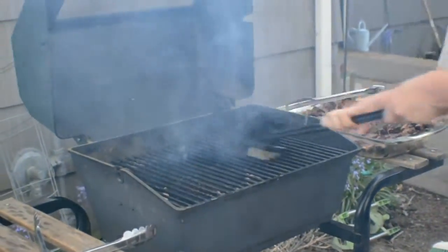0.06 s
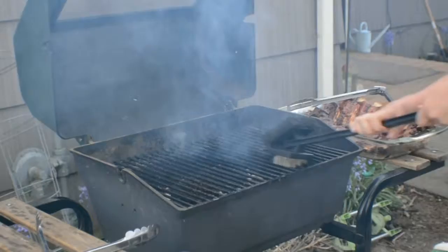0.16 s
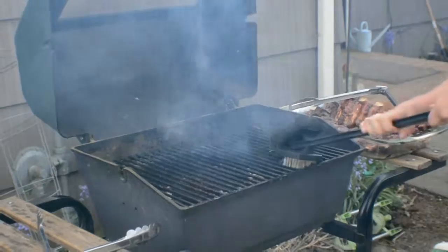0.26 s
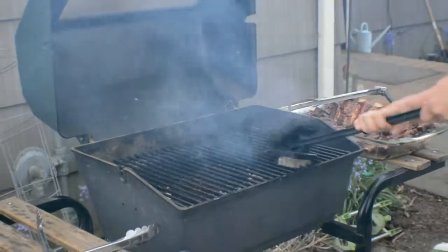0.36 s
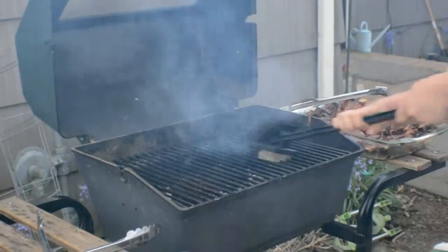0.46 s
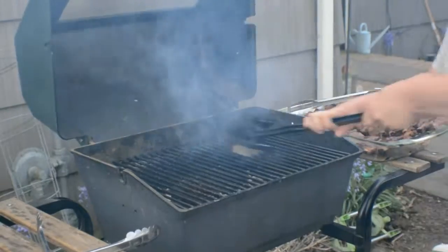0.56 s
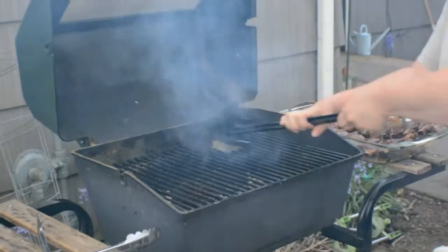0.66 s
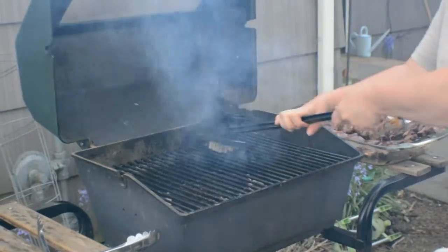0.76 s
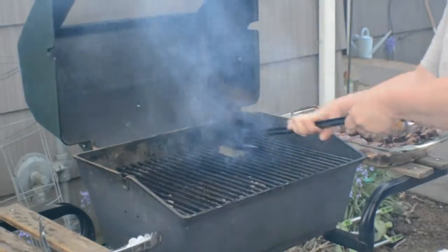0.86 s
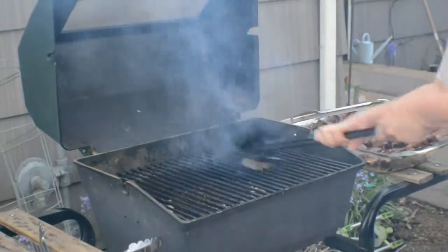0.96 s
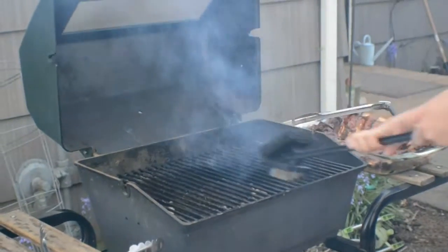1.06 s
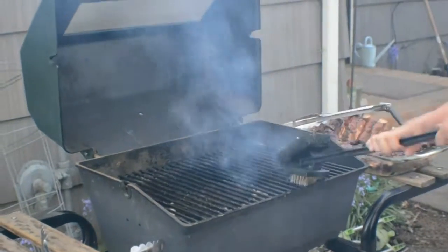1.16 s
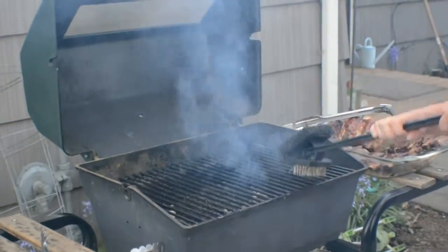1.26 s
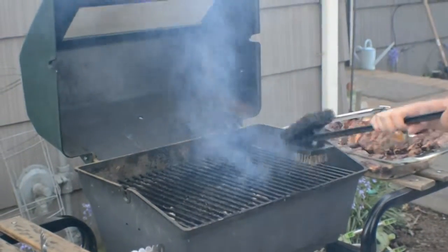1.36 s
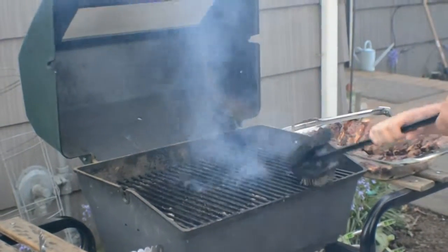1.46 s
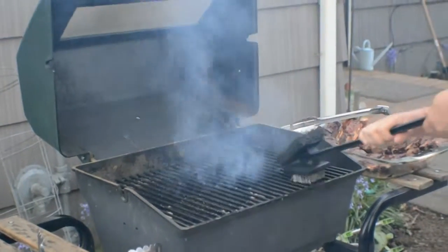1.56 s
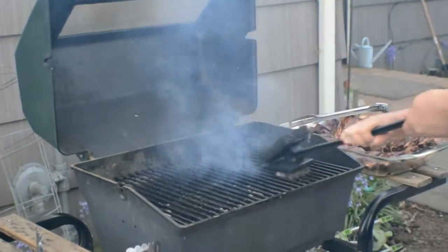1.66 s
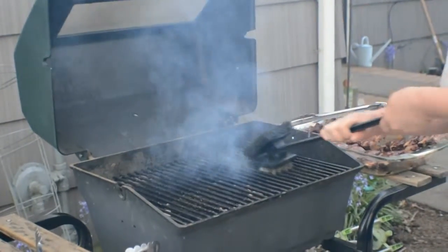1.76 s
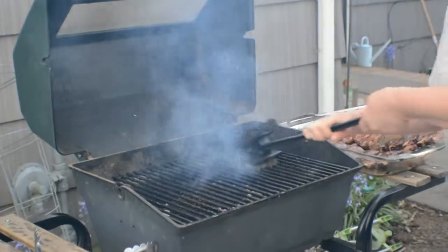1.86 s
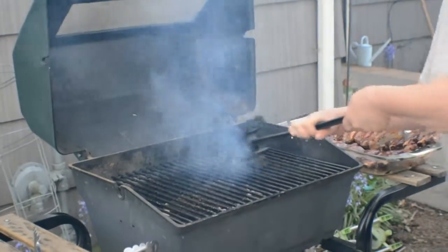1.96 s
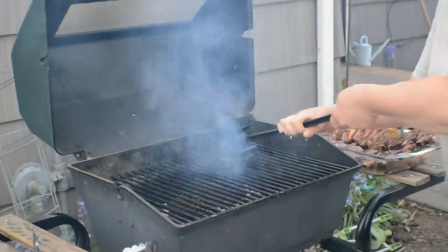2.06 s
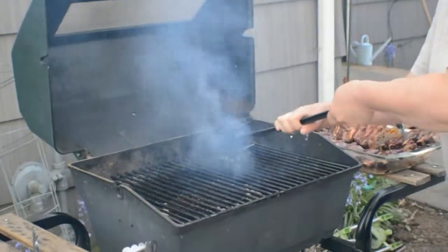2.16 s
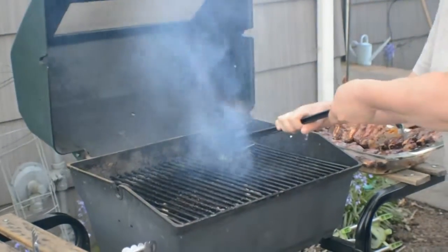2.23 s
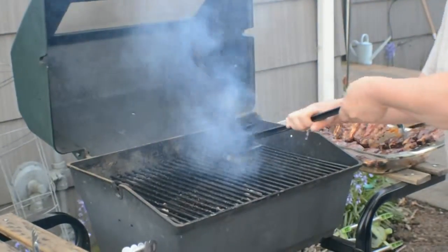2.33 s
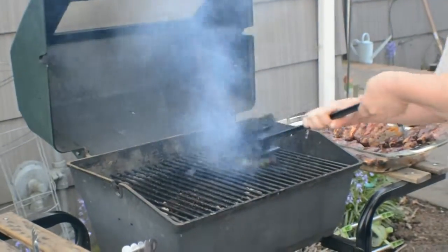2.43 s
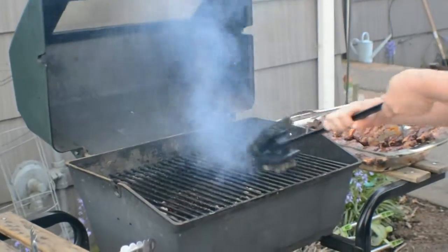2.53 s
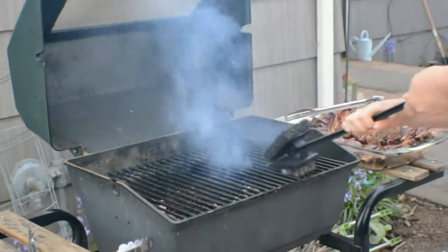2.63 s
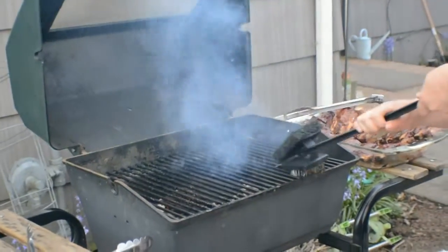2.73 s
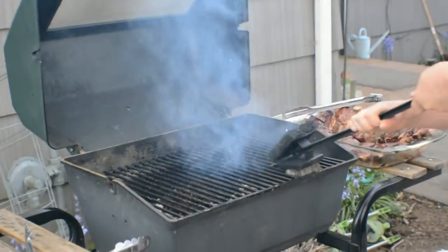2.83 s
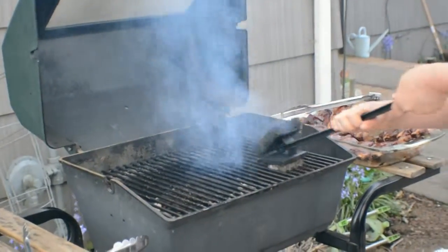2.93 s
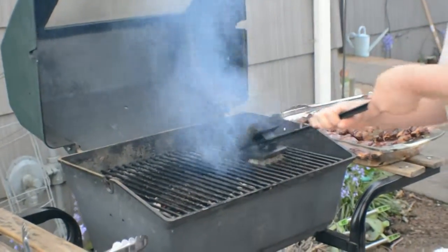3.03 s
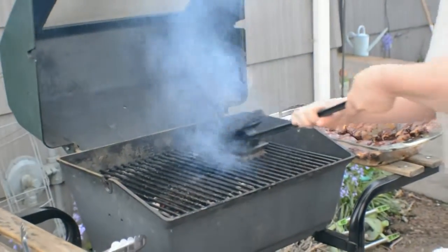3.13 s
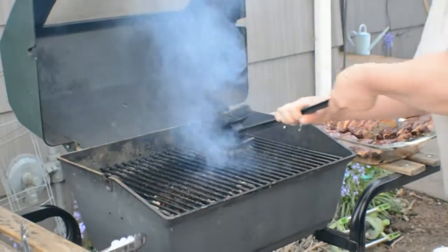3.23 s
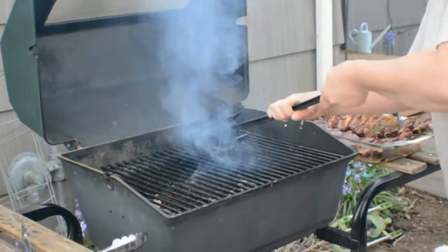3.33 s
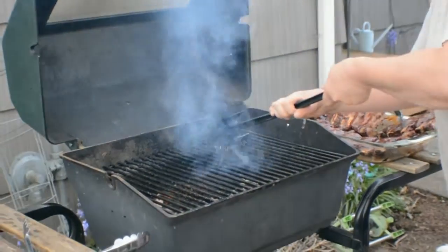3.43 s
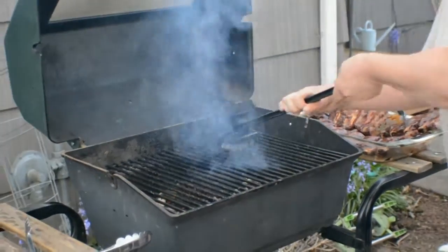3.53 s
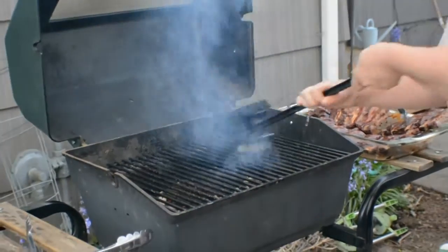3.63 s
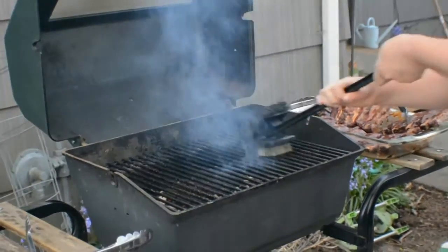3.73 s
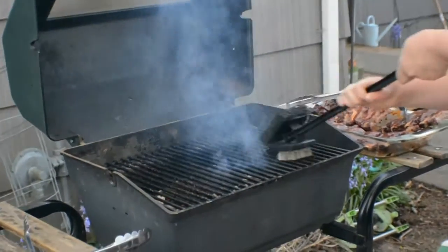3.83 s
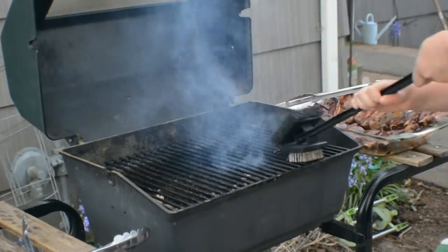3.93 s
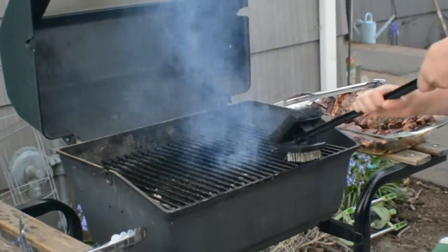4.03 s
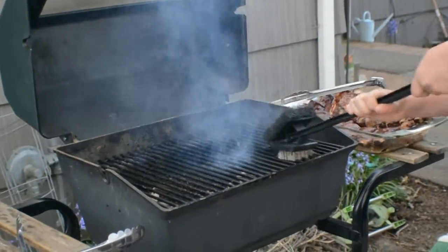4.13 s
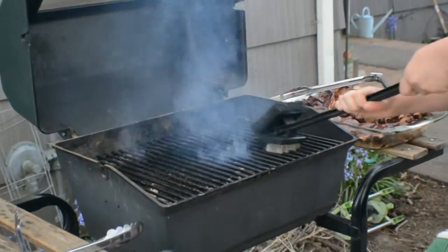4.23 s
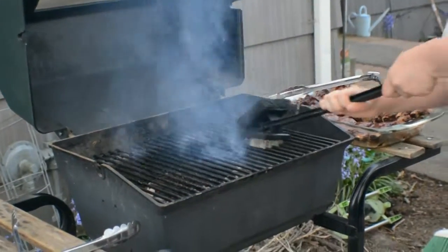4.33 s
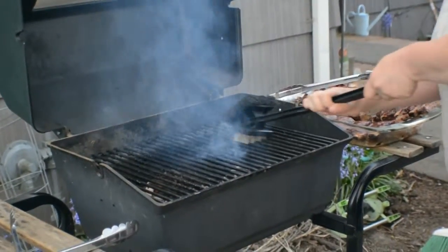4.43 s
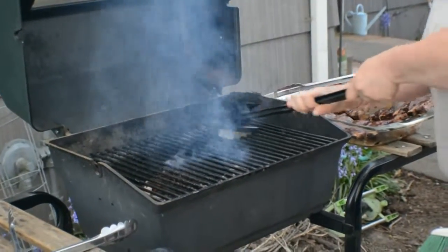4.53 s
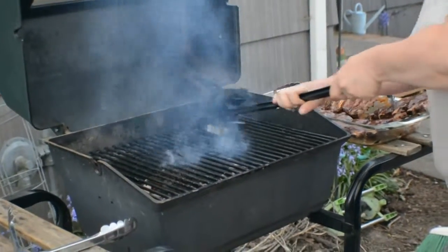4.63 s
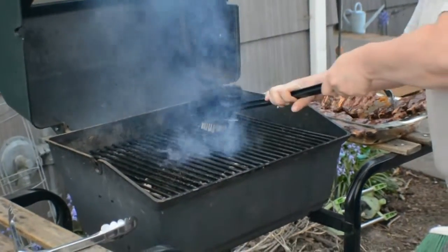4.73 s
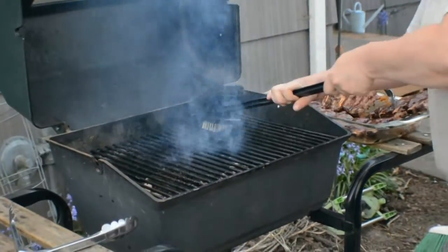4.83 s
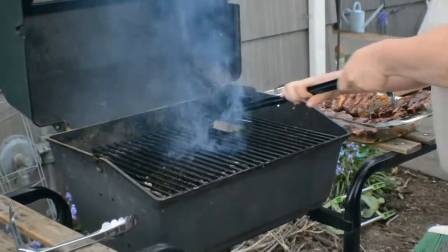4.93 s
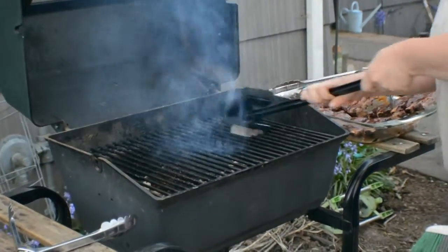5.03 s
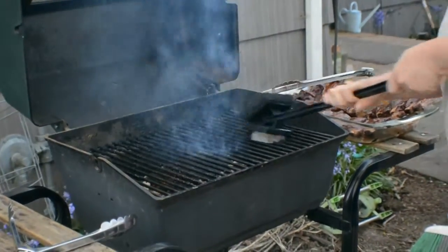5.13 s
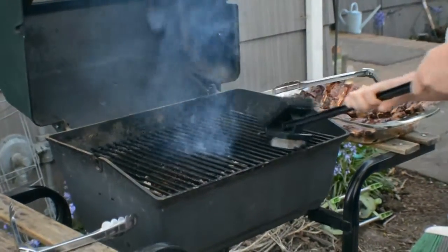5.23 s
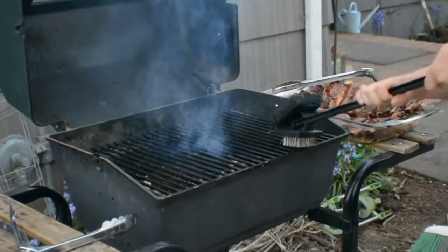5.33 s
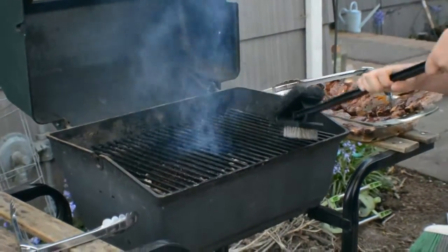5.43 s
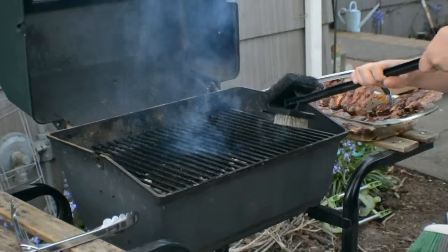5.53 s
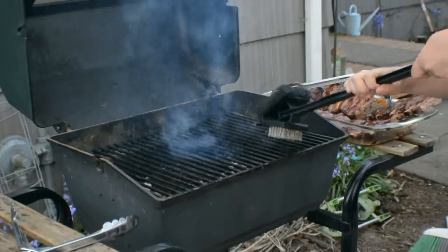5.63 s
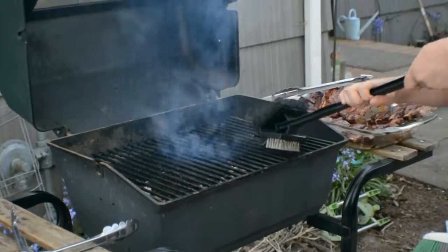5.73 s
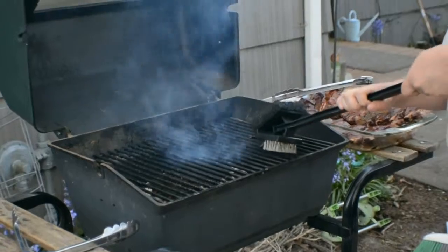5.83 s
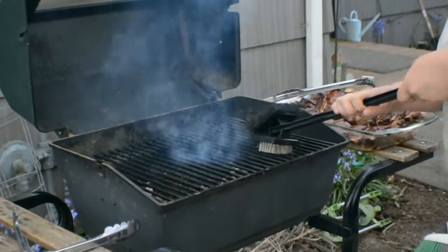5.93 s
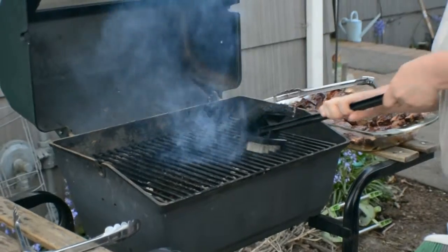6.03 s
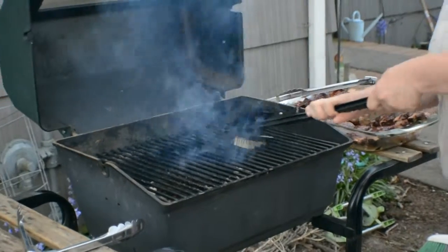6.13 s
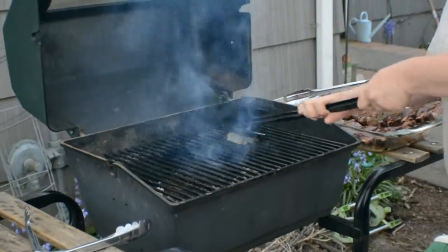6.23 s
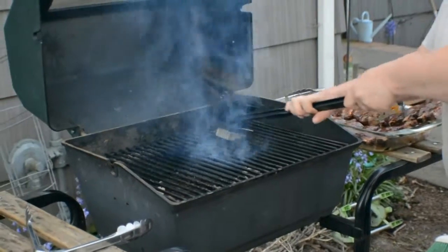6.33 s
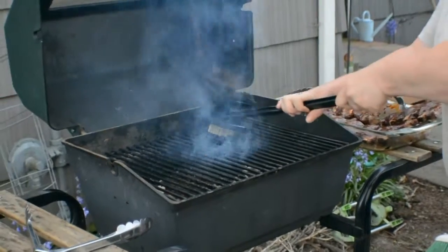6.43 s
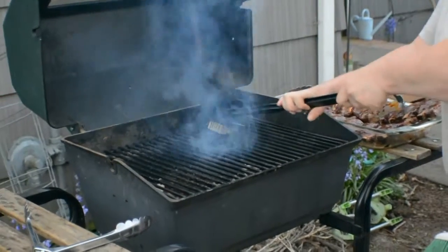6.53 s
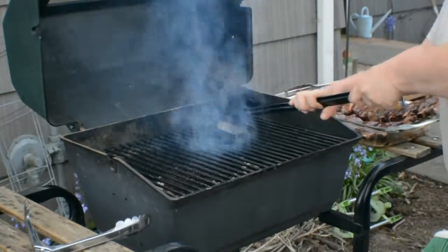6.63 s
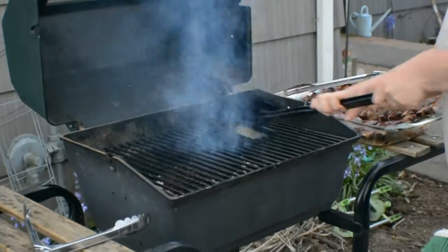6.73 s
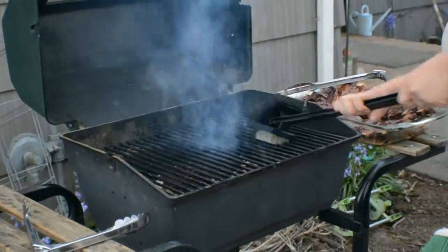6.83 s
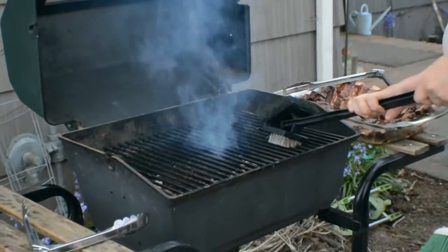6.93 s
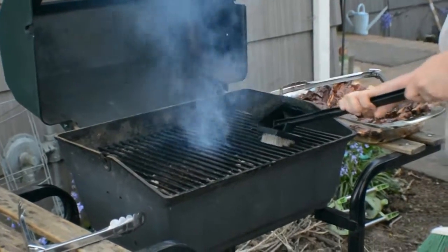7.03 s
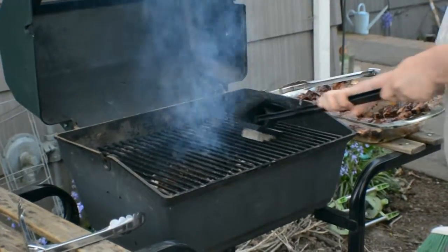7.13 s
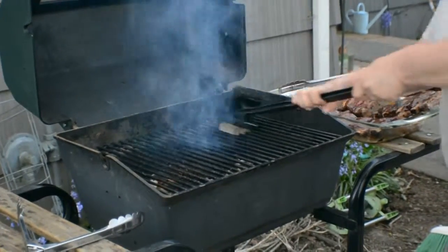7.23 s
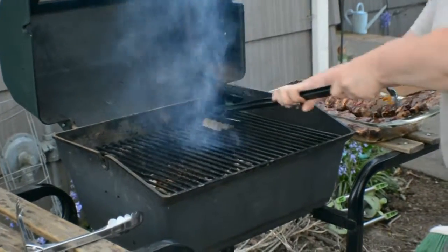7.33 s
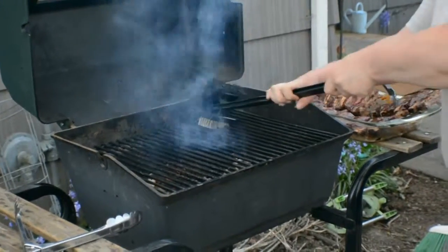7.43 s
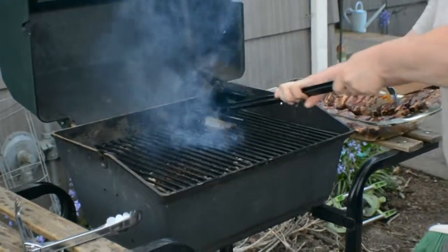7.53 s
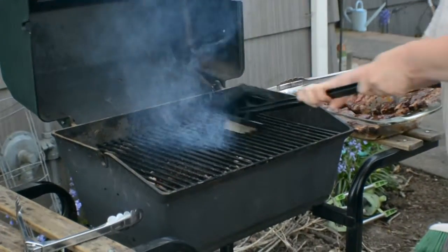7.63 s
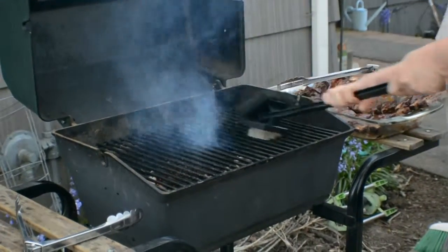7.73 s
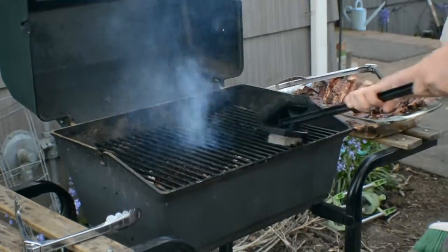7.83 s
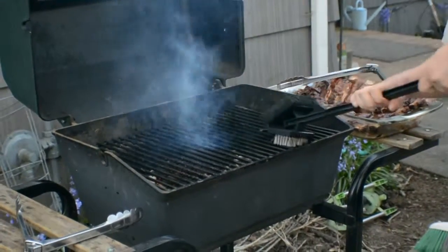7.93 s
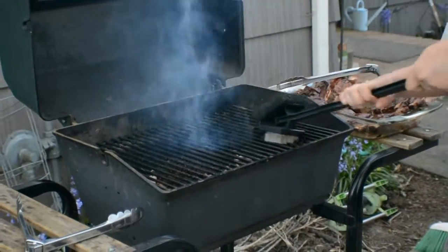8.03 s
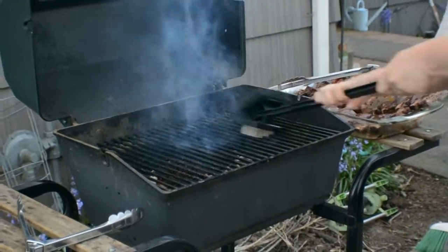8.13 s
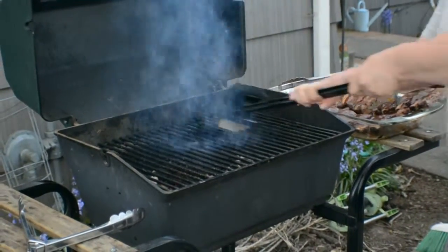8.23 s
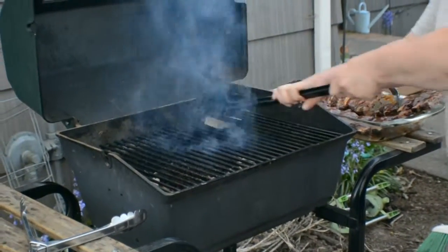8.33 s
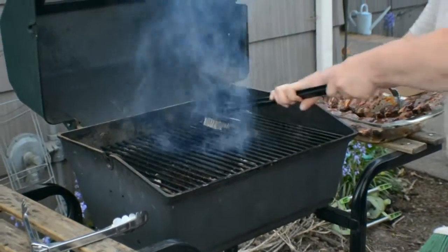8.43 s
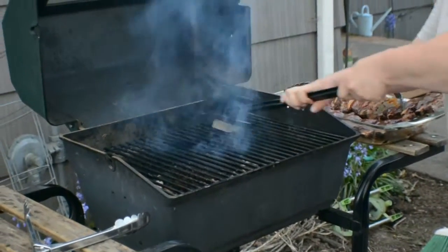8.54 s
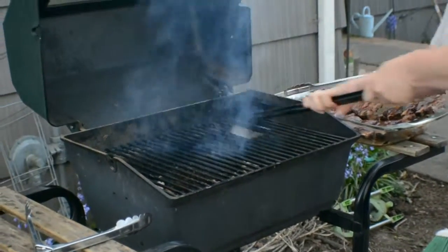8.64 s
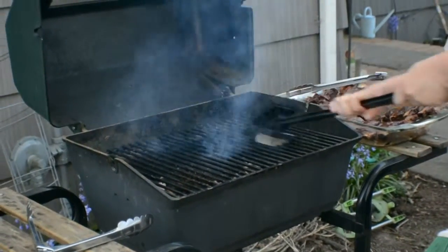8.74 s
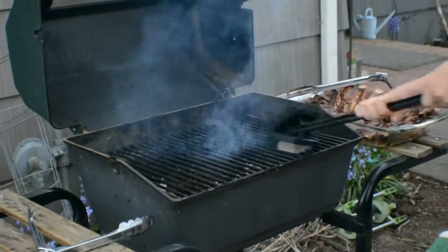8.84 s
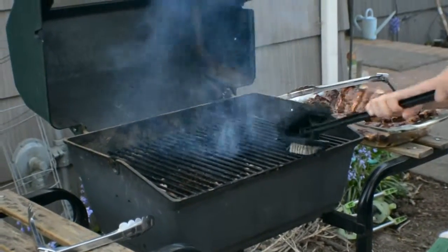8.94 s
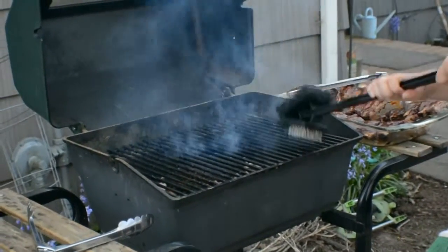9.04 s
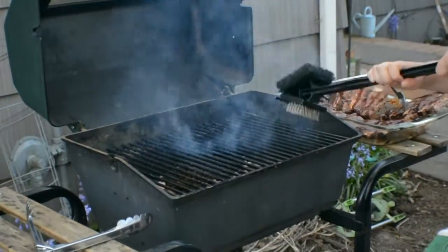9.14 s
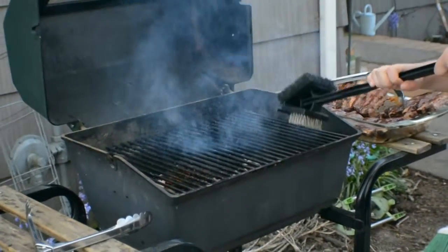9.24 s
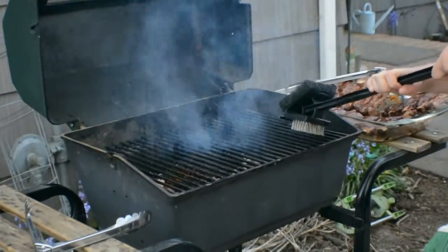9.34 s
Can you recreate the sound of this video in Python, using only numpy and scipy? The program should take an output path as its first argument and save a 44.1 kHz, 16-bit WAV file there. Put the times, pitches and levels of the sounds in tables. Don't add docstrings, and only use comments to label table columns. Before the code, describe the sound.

Repeated raspy scrapes over grill bars alternate with hard hollow metallic knocks, close up, with faint distant traffic hum outdoors.

```python
import sys
import numpy as np
from scipy import signal
from scipy.fft import rfft, irfft, next_fast_len
from scipy.io import wavfile
from scipy.ndimage import uniform_filter1d, map_coordinates

SR = 44100
rng = np.random.default_rng(int(sys.argv[2]) if len(sys.argv) > 2 else 0)


def dump_mix(stems):
    frames = np.atleast_2d(stems).T
    limited = np.clip(frames, -1, 1)
    pcm = np.round(limited * 32767).astype(np.int16)
    wavfile.write(sys.argv[1], SR, pcm)


def undo_db(level):
    steps = np.asarray(level, float) / 20
    return 10 ** steps


N = 413658

# [t/s, peak level/dB, pitch f/Hz, slap over peak/dB, boom over peak/dB]
WALL_BLOWS = [(0.415, -12, 740, 2.5, 2.5), (0.88, -5, 616, -6, -20), (1.631, -6.5, 708, 0, -18),
              (2.325, -6.5, 605, -3.5, -24), (2.914, -11, 721, -15, -15), (3.557, -1.5, 597, -10.5, -10),
              (4.191, -15, 662, -15, -3), (4.915, -6.5, 589, -2.5, -11), (6.06, -20.5, 823, 1, -6),
              (6.634, -15.5, 600, -20, -6), (7.09, -6.5, 858, -6, -12), (7.564, -11.5, 600, -14, -16),
              (8.046, -12, 842, -16, -8), (8.551, -2.5, 596, -6.5, -11)]


def unit(x):
    return x / np.sqrt(np.mean(x ** 2) + 1e-20)


def along(points, hz):
    f, v = np.transpose(points)
    return np.interp(np.log(hz + 1), np.log(f + 1), v)


def curves(rows):
    s, *cols = np.transpose(rows)
    return [np.interp(np.arange(N) / SR, s, c) for c in cols]


def wobble(rate):
    coarse = np.arange(0, N + 8, 8)
    knots = rng.standard_normal(int(N * rate / SR) + 4)
    return np.interp(np.arange(N), coarse, map_coordinates(knots, [coarse * rate / SR]))


def filtered(x, response):
    m = next_fast_len(x.shape[-1] + 4096)
    return irfft(rfft(x, m) * response(np.fft.rfftfreq(m, 1 / SR)), m)[..., :x.shape[-1]]


def ringing(modes, hz):
    return np.sqrt(sum(undo_db(db) ** 2 / (1 + (2 * (hz - c) / w) ** 2) for c, w, db in modes))


def add_at(out, s, sound):
    out[round(s * SR):][:len(sound)] += sound


def brush():
    # [f/Hz, width/Hz, level/dB]
    wire_modes = [(5750, 40, 6), (7170, 60, 6), (7400, 110, 5), (7800, 50, 5), (9110, 110, 1),
                  (11020, 84, -8), (11040, 83, 5), (13450, 200, -14)]
    bar_modes = [(1920, 150, -4), (2200, 50, -7), (2690, 22, -1), (2870, 50, -5), (3400, 110, -9),
                 (3950, 35, -6), (4070, 40, -5), (4970, 35, -7)]
    box_modes = [(299, 34, -6.5), (721, 28, 2.5), (1010, 20, -0.5)]
    # [f/Hz, level per Hz/dB]
    rub_spectrum = [(88, -55), (150, -22.5), (274, -9), (509, -10), (722, -10), (894, -7.5), (1760, -9.5),
                    (1940, -4.5), (2500, -18), (2760, -17.5), (6470, -31), (10900, -31), (15500, -59.5)]

    def blend(modes, song_db, lo, hi):
        rough = slipping(lambda hz: undo_db(along(rub_spectrum, hz)), lo, hi)
        song = drifting(slipping(lambda hz: ringing(modes, hz), lo, hi), depth_db=2.4)
        return (rough + undo_db(song_db) * song) / np.sqrt(1 + undo_db(2 * song_db))

    hiss_db, bars_db, box_db, bar_song_db, wire_song_db = contact()
    wires = undo_db(hiss_db) * blend(wire_modes, wire_song_db, 4700, 17000)
    bars = undo_db(bars_db) * blend(bar_modes, bar_song_db - 4, 1530, 5300)
    box = undo_db(box_db) * blend(box_modes, -2, 136, 1240)
    judder_db = 1.1 * wobble(45)
    return undo_db(0.9 * wobble(25)) * (wires + undo_db(judder_db) * (bars + box))


def slipping(gain, lo, hi):
    plucks = rng.standard_normal(N) * undo_db(1.3 * wobble(400))
    band = lambda hz: 1 / np.sqrt((1 + (lo / (hz + 1)) ** 8) * (1 + (hz / hi) ** 8))
    return unit(filtered(plucks, lambda hz: gain(hz) * band(hz)))


def drifting(x, depth_db):
    z = signal.stft(x, nperseg=512)[2]
    field = uniform_filter1d(rng.standard_normal(z.shape), size=3, axis=0)
    field = uniform_filter1d(field, size=40, axis=1)
    return unit(signal.istft(z * undo_db(depth_db * unit(field)), nperseg=512)[1][:N])


def contact():
    # [fastest t/s, stop t/s, wire hiss level/dB, bars over hiss/dB, firebox over hiss/dB]
    slides = [(.12, .26, -55, 8, 10), (.72, .76, -51.5, 4, 7), (1.02, 1.19, -52.5, 7, 9),
              (2.04, 2.11, -55.5, 13, 15.5), (2.55, 2.77, -56, 6.5, 5), (3.27, 3.355, -51.5, 11.5, 14),
              (3.76, 4.13, -57, 8.5, 11.5), (4.55, 4.75, -57, 11.5, 16), (5.12, 5.35, -56, 9, 11),
              (6.24, 6.48, -57.5, 13, 17), (6.78, 6.92, -60, 17.5, 22), (7.31, 7.4, -57.5, 11, 17),
              (7.72, 7.915, -57, 8.5, 14), (8.33, 8.41, -54, 8, 14.5), (8.72, 8.98, -57.5, 8.5, 13)]
    # [t/s, length/s, hiss level/dB, bars over hiss/dB, firebox over hiss/dB]
    scuffs = [(.012, .04, -58, 21, 25), (.62, .1, -62, 15, 21), (.782, .015, -54, 2, 0),
              (1.25, .055, -55, 1, 3), (1.523, .005, -51, 6, 5), (1.59, .07, -60, 4, 6),
              (2.04, .08, -64, 20, 22), (2.62, .025, -54, 2, 4), (4.29, .04, -57, 10, 17),
              (5.378, .07, -50, 4, 3), (6.005, .07, -59, 13, 13), (6.39, .05, -62, 19, 24),
              (6.88, .04, -64, 23, 26), (7.335, .05, -64, 17, 31), (9.025, .055, -53.5, 5, 6),
              (9.33, .06, -71, 17, 29)]
    # [length/s, hiss level/dB, bars over hiss/dB, firebox over hiss/dB]
    run_up = (.035, -63, 11, 15)
    # [t/s, length/s, gain/dB]
    free_bars = [
        (.65, .3, 6),
        (3.22, .4, 10),
        (4.6, .4, 11),
    ]
    # level/dB of wires' band, bars, firebox
    embers_db = [-78, -64, -51]
    gather_db_per_s, slow_db_per_s, stop_db_per_s = 13, 13, 185
    heavy_swing = 1.3
    scuff_dull = 1.6

    t, thuds = np.arange(0, N / SR + .002, .001), np.array(WALL_BLOWS)[:, 0]
    power = np.full((3, len(t)), 1e-9)
    bump = lambda s, length: np.exp(-(2 * (t - s) / length) ** 4)
    swing = np.c_[[1, heavy_swing, heavy_swing]]
    for fastest, stop, db, *over_db in slides:
        speed_db = -np.maximum(gather_db_per_s * (fastest - t), slow_db_per_s * (t - fastest))
        begun = t >= max(thuds[thuds < fastest], default=0)
        on = begun * undo_db(-stop_db_per_s * np.maximum(t - stop, 0))
        power += (on * undo_db(db + np.c_[[0, *over_db]] + swing * speed_db)) ** 2
    sliding = power[0].copy()
    run_ups = [(s, 2 * run_up[0], *run_up[1:]) for s in thuds]
    for s, length, db, *over_db in list(scuffs) + run_ups:
        power += bump(s, length) * undo_db(db + np.c_[[0, *over_db]]) ** 2
    power += undo_db(np.c_[embers_db]) ** 2
    bar_song_db = -5 + sum(db * bump(s, length) for s, length, db in free_bars)
    wire_song_db = -1.5 + scuff_dull * 10 * np.log10(sliding / power[0])
    return curves(np.c_[t, 10 * np.log10(power.T), bar_song_db, wire_song_db])


def grate():
    # [t/s, peak level/dB, low over peak/dB, bright over peak/dB, T60/s]
    landings = [(0.3894, -12.5, -8.5, -26, 0.41), (0.4044, -17, -13, -11, 0.16),
                (2.894, -11.5, -7, -23.5, 0.32), (3.530, -14.5, -6, -29, 0.5),
                (4.1458, -18.5, -10, -29, 0.28), (4.885, -19, -6.5, -25, 0.64),
                (6.0322, -15, -6.5, -23, 0.33), (6.5878, -19, -10, -25, 0.97),
                (7.0732, -15, -12, -20.5, 0.29), (7.5128, -20, -7, -30, 0.26), (8.030, -11, -9, -23, 0.44),
                (8.5273, -16, -4, -21, 0.55)]
    # [t/s, peak level/dB, T60/s, bright over peak/dB, struck bar f/Hz]
    clangs = [(0.4109, -7.5, .26, -20.5, 1470), (0.8936, -6, .26, -17, 1620), (1.5261, -18, .21, -16, 2200),
              (1.628, -1, .26, -25, 950), (2.3252, -6.5, .33, -24.5, 1560),
              (2.3618, -7.5, .23, -10.5, 1830), (2.918, -9, .27, -16, 1790), (3.5676, -4, .32, -13, 2180),
              (4.1854, -10, .27, -19, 1350), (4.931, -3.5, .28, -10, 1340), (5.927, -18, .2, -7.5, 3820),
              (6.0554, -11.5, .29, -17.5, 1010), (6.6456, -8.5, .26, -12.5, 1480),
              (7.0976, -5.5, .22, -13, 955), (7.5774, -9, .25, -13, 1530), (8.0464, -5, .26, -17, 1004),
              (8.5622, -6, .31, -13.5, 1040)]
    # [t/s, peak level/dB]
    cracks = [
        (.4116, -3),
        (1.6285, -5),
        (4.1858, -8),
        (8.047, -7),
    ]
    out, t = np.zeros(N + SR), np.arange(SR // 2) / SR
    for s, db, low_db, bright_db, t60 in landings:
        swell = 1 - np.exp(-t / (abs(.005 * t60) + 1e-4))
        add_at(out, s, undo_db(db - 13) * shake(low_db, bright_db, t60, ring_hz=1413) * swell)
    for s, db, t60, bright_db, ring_hz in clangs:
        low_db = -11 - .55 * db if db > -15 else -16
        attack = 1 - np.exp(-t / 0.0012)
        add_at(out, s, undo_db(db - 11.5) * shake(low_db, bright_db, t60, ring_hz) * attack)
    crack = undo_db(5 - 60 * t / .011) * (1 - np.exp(-t / .00015)) * np.sin(2 * np.pi * 1550 * t)
    for s, db in cracks:
        add_at(out, s, undo_db(db) * crack)
    return out[:N]


def shake(low_db, bright_db, t60, ring_hz):
    # [f/Hz, level per Hz/dB]
    blow_spectrum = [(59, -67.5), (100, -59), (177, -5), (287, -1.5), (497, -3), (825, -1), (1090, -4.5),
                     (1660, -4.5), (3180, -10.5), (3850, -13.5), (7730, -22.5), (11800, -33), (15500, -68)]
    # [f/Hz, width/Hz, level/dB]
    grate_modes = [(326, 33, -10), (834, 37, -9), (1272, 9.7, -3.5), (1670, 14, -9.5), (2195, 54, -7.5),
                   (2498, 59, -8), (2880, 11, -9), (3680, 100, -15.5), (3787, 27, -9), (4420, 56, -12),
                   (4855, 41, -12.5), (4990, 60, -18), (5380, 36, -20), (6140, 44, -17), (6740, 120, -26),
                   (8150, 110, -23)]
    bowl_modes = [(298, 47, -3.5), (600, 27, -2), (692, 25, -1.5)]
    # [f/Hz, share of T60]
    damping = [(200, 0.86), (1000, 1.01), (4000, 0.77), (12000, 0.56)]

    hz, frame, z = signal.stft(rng.standard_normal(SR // 2), SR, nperseg=128)
    decay = undo_db(-60 * frame / (max(t60, .03) * along(damping, hz)[:, None]))
    noise = signal.istft(z * decay, SR, nperseg=128)[1][:SR // 2]
    modes = [(c, w + 25, db + rng.normal(0, 2.6)) for c, w, db in list(grate_modes) + list(bowl_modes)]
    tilt = [(450, low_db + 4), (1500, 0), (5500, bright_db + 12)]

    def colour(f):
        struck_bar = 1 + undo_db(-2) / (1 + (2 * (f - ring_hz) / (0.073 * ring_hz)) ** 2)
        return singing(blow_spectrum, modes, 1.96, f) * struck_bar * undo_db(along(tilt, f))

    ring = filtered(noise, colour)
    knots = np.r_[1, rng.standard_normal(119)]
    rattle = np.interp(np.arange(SR // 2), np.linspace(0, SR // 2, num=120), knots)
    ring = ring * undo_db(1.57 * rattle)
    middle = signal.sosfilt(signal.butter(2, [900, 2600], "band", fs=SR, output="sos"), ring[:900])
    return ring / np.sqrt(np.mean(middle ** 2))


def singing(spectrum, modes, rise_db, hz):
    power = 1 + sum(undo_db(db - along(spectrum, c) + rise_db) ** 2 / (1 + (2 * (hz - c) / w) ** 2)
                    for c, w, db in modes)
    return undo_db(along(spectrum, hz)) * np.sqrt(power)


def block():
    # [f over pitch, level/dB]
    wall_modes = [(1.001, 3), (1.3, -2.5)]
    # [f/Hz, level per Hz/dB]
    slap_spectrum = [(300, -27), (900, -5), (2200, 0), (4500, -20), (9000, -50)]
    out, t = np.zeros(N + SR), np.arange(SR // 4) / SR
    for s, db, hz, slap_db, boom_db in WALL_BLOWS:
        ring = sum(undo_db(level + rng.normal(0, 0.5)) * np.sin(2 * np.pi * k * hz * t) for k, level in wall_modes)
        slap = undo_db(slap_db) * unit(filtered(rng.standard_normal(len(t)), lambda f: undo_db(along(slap_spectrum, f))))
        boom = undo_db(boom_db + 6.5) * np.sin(2 * np.pi * 285 * t)
        t60 = max(.045 - .0026 * db, .01)
        envelope = undo_db(db - 4 - 60 * t / t60) * (1 - np.exp(-t / 0.0023))
        add_at(out, s, envelope * (ring + slap + boom))
    return out[:N]


def rim():
    # [t/s, level/dB, length/s]
    lifts = [
        (1.243, -44, 0.045),
    ]
    # [f/Hz, width/Hz, level/dB]
    rim_modes = [(2180, 51, 0), (2790, 110, -16), (3390, 190, -16), (6330, 78, -19), (8210, 150, -22),
                 (9500, 49, -14)]
    t = np.arange(N) / SR
    gate = sum(undo_db(db) * np.exp(-(2 * (t - s) / length) ** 4) for s, db, length in lifts)
    return gate * unit(filtered(rng.standard_normal(N), lambda hz: ringing(rim_modes, hz)))


def blade():
    ticks = [
        1.5262,
        5.9275,
    ]
    # [f/Hz, level/dB, T60/s]
    blade_modes = [
        [(2120, 4, 0.066), (4032, -9, 0.23), (4479, -13, 0.13), (5631, -15, 0.17)],
        [(2848, -9, 0.1), (3391, -5, 0.082), (3747, 2, 0.058), (4646, -3, 0.033), (6223, -12, 0.088)],
    ]
    tick_db = [-33, -23.5]
    out, t = np.zeros(N + SR), np.arange(SR // 4) / SR
    for s, modes, level_db in zip(ticks, blade_modes, tick_db):
        ring = sum(undo_db(db - 60 * t / min(t60, .25)) * np.sin(2 * np.pi * hz * t) for hz, db, t60 in modes)
        add_at(out, s, undo_db(level_db) * ring * (1 - np.exp(-t / .0005)))
    return out[:N]


def bird():
    # [t/s, pitch f/Hz, level/dB]
    peep = [
        (5.68, 3400, -66),
        (5.75, 3380, -66),
        (5.8, 3150, -65),
        (5.85, 3310, -62),
        (5.91, 3180, -69),
    ]
    hz, db = curves(peep)
    t = np.arange(N) / SR
    on = (t > peep[0][0]) & (t < peep[-1][0])
    phase = 2 * np.pi * np.cumsum(hz + 40 * wobble(120)) / SR
    return undo_db(db + 3.2 * wobble(45)) * on * np.sin(phase)


def yard():
    # [f/Hz, level per Hz/dB]
    yard_spectrum = [(11, -73), (18, -53), (81, -10.5), (150, -11), (183, -6.5), (313, -9), (382, -1.5),
                     (416, -10.5), (521, -6.5), (635, -9), (1060, -6), (2330, -21.5), (12700, -41),
                     (15500, -50)]
    # [f/Hz, side under mid/dB]
    yard_width = [(60, -27), (110, -24), (200, -24.5), (380, -19), (700, -16), (1290, -14.5), (2380, -5),
                  (4400, -3.5), (8120, -3.5), (15000, -3.5)]
    mid, side = filtered(rng.standard_normal((2, N)), lambda hz: undo_db(along(yard_spectrum, hz)))
    side = filtered(side, lambda hz: undo_db(along(yard_width, hz)))
    return undo_db(-47.5 + 1.7 * wobble(3.21)) * np.array([mid + side, mid - side]) / np.std(mid)


def scene():
    # [f/Hz, side under mid/dB]
    near_width = [(60, -40), (110, -42), (200, -73), (380, -47), (700, -36), (1290, -26), (2380, -23.5),
                  (4400, -13.5), (8120, -12.5), (15000, -13)]
    metal = brush() + rim() + grate() + block() + blade()
    metal = signal.sosfilt(signal.butter(6, 150, "high", fs=SR, output="sos"), metal)
    z = signal.stft(metal, nperseg=256)[2]
    scattered = signal.istft(z * np.exp(2j * np.pi * rng.random(z.shape)), nperseg=256)[1][:N]
    side = filtered(scattered, lambda hz: undo_db(along(near_width, hz)))
    return np.array([metal + side, metal - side]) + bird() + yard()


def band_limit(x):
    return signal.sosfilt(signal.butter(12, 15680, fs=SR, output="sos"), x)


def record(dry):
    # [f/Hz, level/dB]
    whine_tones = [(15682, -94)]
    t = np.arange(N) / SR
    whine = sum(np.sqrt(2) * undo_db(db) * np.sin(2 * np.pi * hz * t) for hz, db in whine_tones)
    held = dry / (1 + np.abs(dry / 1.2) ** 6) ** (1 / 6)
    held = filtered(held, lambda hz: hz < 15700)
    return band_limit(np.clip(held + whine, -1, 1))


dry = scene()
out = record(dry)
dump_mix(out)
```